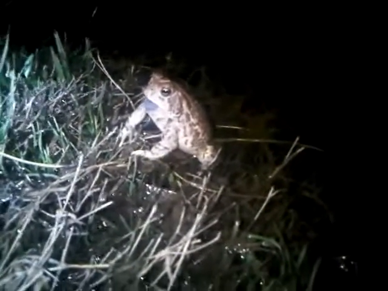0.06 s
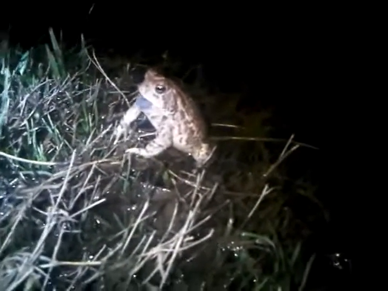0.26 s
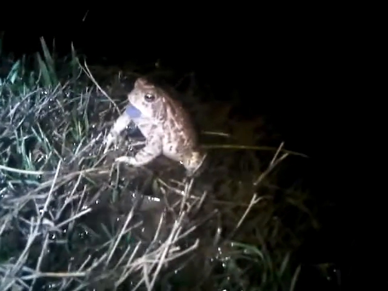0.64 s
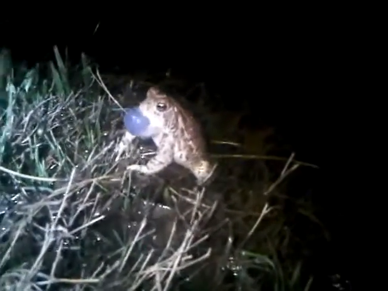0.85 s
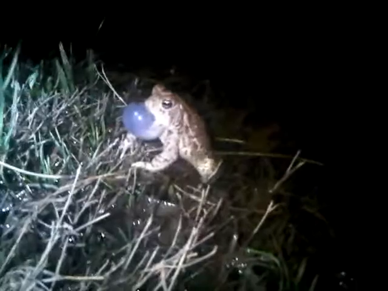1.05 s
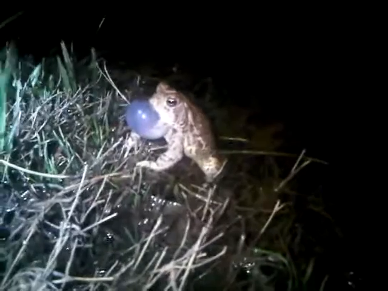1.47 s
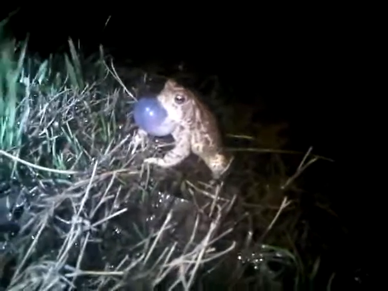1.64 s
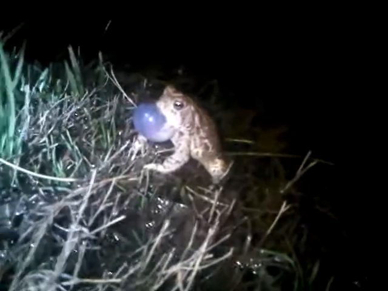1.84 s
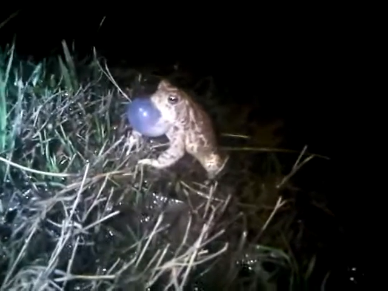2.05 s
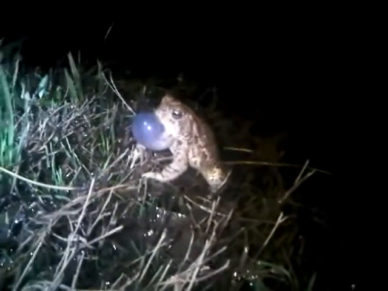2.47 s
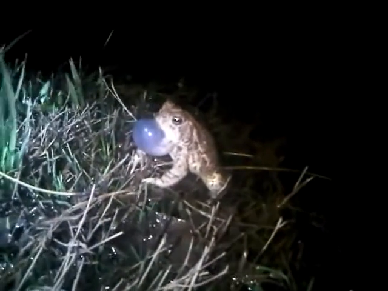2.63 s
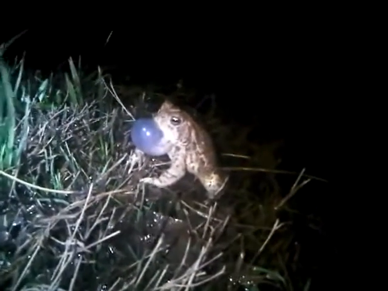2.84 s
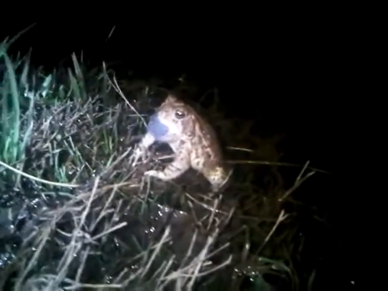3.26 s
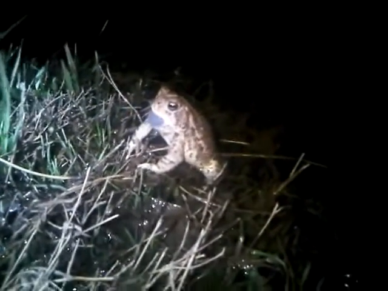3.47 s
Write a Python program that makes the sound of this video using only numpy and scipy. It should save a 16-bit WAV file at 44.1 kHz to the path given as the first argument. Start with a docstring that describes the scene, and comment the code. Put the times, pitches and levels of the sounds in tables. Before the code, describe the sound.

A nearby toad trills outdoors at night, rising in pitch into one long, rapid, even buzz. Before it starts, light wind and dull handling crackles touch the microphone, while a second toad trills faintly in the distance.

```python
"""In the grass at night, a toad close to the microphone swells its throat and trills for 2.5 seconds.
Each pulse is a short burst of one tone, with overtones, snaps of the larynx and the ring of the vocal sac;
the tone glides up and the pulses separate as the call starts. Farther off, a toad ends a call and
begins another. Moving air buffets the microphone softly; there are dull handling crackles and one tick."""
import sys
import numpy as np
from scipy import signal
from scipy.fft import rfft, irfft, next_fast_len
from scipy.io import wavfile
from scipy.ndimage import map_coordinates

SR = 44100
rng = np.random.default_rng(int(sys.argv[2]) if len(sys.argv) > 2 else 0)


def unload_wav(signal):
    """Save mono or channel-first audio to the path in sys.argv[1] as 16-bit WAV at rate SR, clipped to [-1, 1]."""
    wavfile.write(
        sys.argv[1],
        SR,
        np.round(np.clip(np.atleast_2d(signal).T, -1, 1) * 32767).astype(np.int16),
    )


N = 154350
T = np.arange(N) / SR

# Overtones of both toads: multiple of the tone, relative level/dB
OVERTONES = [(2, -21.5), (3, -24)]


def amp(db):
    """Decibels to gain."""
    return 10 ** (np.asarray(db) / 20)


def unit(x):
    """x at rms 1."""
    return x / np.sqrt(np.mean(x ** 2) + 1e-20)


def curves(rows, at):
    """Each column after the time, read at the given times."""
    times, *columns = np.transpose(rows)
    return [np.interp(at, times, column) for column in columns]


def wobble(rate):
    """A smooth random curve, rate knots a second."""
    return map_coordinates(rng.standard_normal(int(N * rate / SR) + 4), [T * rate])


def filtered(x, response):
    """x times a response of frequency."""
    size = next_fast_len(N + SR // 2)
    return irfft(rfft(x, size) * response(np.fft.rfftfreq(size, 1 / SR)), size)[:N]


def coloured(x, points):
    """x through (f/Hz, level/dB) points on a log axis."""
    f, db = np.transpose(points)
    return filtered(x, lambda hz: amp(np.interp(np.log(hz + 1), np.log(f), db)))


def resonance(x, centre_hz, width_hz):
    """x through one ringing resonance."""
    return filtered(x, lambda f: 1j * f * width_hz / (centre_hz ** 2 - f ** 2 + 1j * f * width_hz))


def windows(times, size):
    """Sample numbers around each time, and their distance from it in s."""
    index = np.round(times * SR).astype(int)[:, None] + np.arange(-size, size + 1)
    return index, index / SR - times[:, None]


def summed(index, waves):
    """Short waves laid on the time line."""
    inside = (index >= 0) & (index < N)
    return np.bincount(index[inside], waves[inside], N)


def clicks(times, gains):
    """Impulses that may fall between samples."""
    index, t = windows(times, size=8)
    return summed(index, gains[:, None] * np.sinc(t * SR) * np.hanning(t.shape[1]))


def air(lumpy_db=3.5, hiss_db=-81):
    """Air moving past the microphone makes a lumpy rumble over a very faint steady hiss."""
    # Strength of the rumble: t/s, level/dB
    gusts = [(0, -38), (.1, -54), (.25, -35.5), (.34, -52.5), (.385, -55), (.43, -28), (.52, -37),
             (.62, -39), (.75, -41), (.87, -34.5), (1.0, -46), (1.12, -36), (1.22, -56.5), (1.53, -43),
             (1.66, -58.5), (1.76, -38.5), (1.83, -55), (1.92, -37.5), (2.02, -58.5), (2.6, -50.5),
             (2.77, -38), (2.9, -59.5), (3.2, -61), (3.42, -51)]
    # Spectra of rumble and hiss: f/Hz, relative level/dB
    rumble_colour = [(20, -26), (60, -5), (130, 4), (250, -0.5), (400, -11.5), (700, -23.5), (1200, -30),
                     (2200, -51.5), (3200, -86.5)]
    hiss_colour = [(30, 18.5), (300, 14.5), (1500, -2), (3000, -0.5), (7000, 0.5), (7700, -26.5),
                   (16000, -14.5)]
    level_db, = curves(gusts, T)
    lumps = rng.standard_normal(N) * amp(lumpy_db * wobble(140))
    rumble = unit(coloured(lumps, rumble_colour))
    hiss = unit(coloured(rng.standard_normal(N), hiss_colour))
    return amp(level_db) * rumble + amp(hiss_db) * hiss


def buffets(steepness=2.54, trim_db=-2, low_cut_hz=137):
    """Each buffet is one rounded push and pull of air on the microphone."""
    # Buffets: t/s, relative level/dB, f/Hz
    puffs = [(0.057, -21.5, 181), (0.115, -27.5, 188), (0.15, -22, 195), (.212, -20, 191), (.245, -25, 223),
             (0.257, -29, 254), (0.28, -24, 280), (.362, -21.5, 298), (.374, -23, 268), (0.395, -15.5, 227),
             (.41, -10.5, 207), (0.416, -25, 178), (0.43, -16, 293), (.445, -20, 405), (0.451, -15, 319),
             (0.467, -33, 290), (0.478, -19.5, 367), (0.5, -38, 223), (0.531, -17, 232), (.557, -20.5, 300),
             (0.578, -16.5, 295), (.609, -13, 344), (.633, -16.5, 420), (.652, -16.5, 340),
             (0.688, -29, 190), (0.709, -25, 192), (0.778, -26, 200), (0.841, -15.5, 250),
             (0.913, -25, 170), (1.08, -31.5, 244), (1.099, -19, 331), (1.109, -17.5, 279.1),
             (1.401, -29.5, 186), (1.463, -27, 224), (1.525, -22, 356), (1.542, -24, 270.3),
             (1.745, -24, 227), (1.759, -24.5, 300), (1.911, -23.5, 219.9), (1.927, -26.5, 288.3),
             (2.095, -29.5, 208), (2.262, -29.5, 196), (2.531, -29.5, 192), (2.591, -35, 203),
             (2.686, -24.5, 190), (2.728, -23.5, 359), (2.763, -15.5, 241.4), (2.776, -20.5, 242),
             (2.798, -26, 310), (3.354, -24, 177)]
    times, db, hz = np.transpose(puffs)
    index, t = windows(times, size=1500)
    random_turn = np.exp(2j * np.pi * rng.random((len(times), 1)))
    push = random_turn / (1 - 2j * np.pi * hz[:, None] * t / steepness) ** steepness
    pushes = summed(index, amp(db + trim_db)[:, None] * push.real * np.hanning(t.shape[1]))
    return filtered(pushes, lambda f: 1j * f / (low_cut_hz + 1j * f))


def crackles(half_s=0.0018):
    """Handling noise: each crackle is a few milliseconds of dull noise."""
    # Crackles: t/s, relative level/dB
    touches = [(.41, -20.5), (0.434, -23.5), (.446, -23), (.452, -26), (.481, -25), (0.497, -23.5),
               (.554, -30), (.58, -21), (0.607, -28), (0.631, -29.5), (.644, -29.5)]
    # Their spectrum: f/Hz, level/dB
    colour = [(100, -17), (400, 4.5), (900, 1), (2200, -30), (3000, -55), (5000, -59.5)]
    times, db = np.transpose(touches)
    index, t = windows(times, size=400)
    envelope = summed(index, amp(db)[:, None] * np.exp(-(t / half_s) ** 2))
    return coloured(envelope * rng.standard_normal(N), colour)


def tick(at_s=2.3605, corner_hz=960):
    """One sharp dry tick: a low-passed impulse."""
    impulse = clicks(np.array([at_s]), amp([-3.5]))
    return filtered(impulse, lambda hz: 1 / (1 + 1j * hz / corner_hz))


def ground_scatter(x, level_db=-24, t60_s=.09):
    """The surroundings scatter a short weak tail back to the microphone."""
    t = T[:SR // 4]
    tail = rng.standard_normal(len(t)) * amp(-60 * t / t60_s)
    return amp(level_db) * signal.fftconvolve(x, tail / np.linalg.norm(tail))[:N]


def overtone_wave(phase):
    """The overtones of a tone with this phase."""
    return sum(amp(db) * np.cos(round(multiple) * phase) for multiple, db in OVERTONES)


def gliding_overtones(count, voice_rows, settle_s, warble=0.054, growth=0.6, trim_db=-6.5):
    """During the opening glide the overtones run on unbroken and warble once a pulse."""
    hz, db, _ = curves(voice_rows, T)
    phase = 2 * np.pi * np.cumsum(hz * (1 + warble * np.sin(2 * np.pi * count))) / SR
    fade = np.minimum(2 * count, 1) * np.interp(T, settle_s, [1, 0])
    level_db = trim_db + db.max() + growth * (db - db.max())
    return fade * amp(level_db) * overtone_wave(phase)


def pulsed_overtones(burst, phase, gain, settled, growth=0.64, sharpness=2.5):
    """In the steady trill the overtones come in shorter bursts and grow more slowly than the tone."""
    strength = gain.max() * (gain / gain.max()) ** growth * amp(-3 * settled)
    return (settled * strength)[:, None] * burst ** sharpness * overtone_wave(phase)


def vocal_sac(tone, pulsing, ring_hz=1715, t60_s=.02):
    """The sac rings freely only between pulses."""
    ring = resonance(tone, ring_hz, width_hz=np.log(1000) / (np.pi * t60_s))
    return amp(-3) * np.exp(-2 * pulsing) * ring


def larynx(times, gain, snap_scatter_db, rasp_envelope, rasp_db=-24):
    """With each pulse the larynx opens, flaps and shuts, and noise escapes; the throat colours both."""
    # The three snaps: t/ms from the middle of a pulse, relative level/dB
    snap_rows = [(-1.54, 3), (0.7, -2), (2.5, 0.5)]
    # Response of the throat: f/Hz, level/dB
    throat = [(250, -26.5), (550, -3.5), (750, -3.5), (1000, 5), (1300, 7), (1900, 14.5), (2150, 5),
              (2350, -3), (2600, -2), (2800, -8), (3100, -2.5), (3450, -23.5), (3750, -13.5), (3950, -24.5),
              (4150, -7), (4400, -24.5), (4700, -19), (5050, -44.5), (5350, -36), (5550, -35),
              (5750, -34.5), (6000, -41.5), (7200, -66.5), (9000, -81.5)]
    # A high resonance that comes out late in the call: t/s, relative level/dB
    whistle_levels = [(1.0, -11), (1.4, -19), (2.3, -18), (2.7, -11.5), (3.25, -9)]
    snaps = sum(clicks(times + ms / 1000, gain * amp(db + scatter_db))
                for (ms, db), scatter_db in zip(snap_rows, snap_scatter_db))
    rasp = amp(rasp_db) * rasp_envelope * rng.standard_normal(N)
    whistle_db, = curves(whistle_levels, T)
    whistle = amp(whistle_db) * resonance(snaps, centre_hz=4175, width_hz=110)
    return coloured(snaps + rasp, throat) + whistle


def trill(rate_rows, voice_rows, settle_s, buzz_db, jitter_s):
    """One call: a train of tone bursts with overtones, the ring of the sac and the buzz of the larynx."""
    # Colour of the overtones: f/Hz, level/dB
    overtone_colour = [(2200, 5.5), (3100, -12), (3450, -19.5), (3750, -16), (4200, -16), (4500, -24.5),
                       (4950, -32.5), (6200, -27.5), (7000, -41.5)]
    rate, = curves(rate_rows, T)
    calling = (T >= rate_rows[0][0]) & (T <= rate_rows[-1][0])
    count = np.cumsum(rate * calling) / SR
    times = np.interp(np.arange(.5, count[-1]), count, T)
    late, louder, higher, *snap_chance = rng.standard_normal((400, 6))[:len(times)].T
    loosening = 1 + 0.23 * (times - times[0])  # the timing loosens as the toad tires
    times = times + jitter_s * loosening * late

    hz, db, half_ms = curves(voice_rows, times)
    gain = amp(db + .2 * louder)
    settled = np.interp(times, settle_s, [0, 1])
    hz = hz * (1 + 0.0038 * settled * higher)
    # The phase runs on from pulse to pulse at first; once settled, all pulses start in the same phase.
    cycles = np.diff(times, prepend=times[0]) * (hz + np.roll(hz, 1)) / 2
    start = np.cumsum((1 - settled) * (cycles - np.round(cycles)))
    index, t = windows(times, size=500)
    phase = 2 * np.pi * (start[:, None] + hz[:, None] * t)
    burst = np.exp(-np.abs(1000 * t / half_ms[:, None]) ** 2.48)  # a bell with a flattened top
    tone = summed(index, gain[:, None] * burst * np.cos(phase))

    overtones = gliding_overtones(count, voice_rows, settle_s)
    overtones += summed(index, pulsed_overtones(burst, phase, gain, settled))
    sac = vocal_sac(tone, pulsing=summed(index, burst))
    rasp_envelope = summed(index, (gain * (0.22 + 0.84 * settled))[:, None] * burst)
    buzz = larynx(times, gain * settled, 0.5 * np.array(snap_chance), rasp_envelope)
    return tone + sac + coloured(overtones, overtone_colour) + amp(buzz_db) * buzz


def far_toad():
    """Farther from the microphone, lower and fainter, a toad ends one call and begins another."""
    # The two calls: t/s, pulse rate/Hz, f/Hz, level/dB, pulse half length/ms
    ending = [(0, 126.6, 1470, -49, 1.93), (.2, 123.5, 1480, -47.5, 2.5), (.3, 118.5, 1440, -50, 2.8),
              (.38, 104, 1420, -51.5, 2)]
    next_call = [(1.5, 96.7, 1184, -61.5, 6.9), (1.65, 114.8, 1399, -42, 3.46),
                 (1.85, 119.9, 1572, -36.5, 2.6), (2.5, 117, 1557, -33.5, 3.2),
                 (3.28, 114.4, 1532, -34.5, 2.26), (3.51, 112.7, 1547, -37, 3.04)]
    calls = np.zeros(N)
    for rows, settle_s in [(ending, (-2, -1)), (next_call, (1.75, 2.1))]:  # the first is already steady
        rates = [(s, rate) for s, rate, *_ in rows]
        voice = [(s, *rest) for s, _, *rest in rows]
        calls += trill(rates, voice, settle_s, buzz_db=-6, jitter_s=2e-5)
    return calls


def near_toad():
    """Close by, the pulse rate climbs, sags as the toad tires and drops at the end."""
    # Pace through the call: t/s, pulse rate/Hz
    rising = [(.771, 94.32), (.82, 102.59), (.87, 110.59), (1.0, 120.41)]
    held = [(1.12, 122.79), (1.3, 121.76), (1.53, 120.3), (1.8, 116.9), (2.1, 115.28), (2.355, 112.32),
            (2.36, 32.71), (2.365, 112.38)]  # at the tick, a brief dropout shifts the pulses by half a beat
    tiring = [(2.75, 110.72), (3.15, 108.42), (3.2, 103.54), (3.25, 89.87), (3.266, 67)]
    # Tone of the pulses: t/s, f/Hz, level/dB, pulse half length/ms
    voice = [(.768, 1163, -39, 4.5), (.81, 1254, -35.5, 4.5), (.87, 1352, -27.5, 3.5),
             (0.958, 1456, -23, 3.7), (1.029, 1527, -16.5, 3.25), (1.101, 1590, -17.5, 2.3),
             (1.2, 1611, -19, 1.96), (1.5, 1625, -18, 1.6), (1.85, 1620, -18, 1.84),
             (2.3, 1620, -17.5, 2.1), (2.9, 1613, -18, 2.26), (3.245, 1602, -17, 2.18),
             (3.26, 1410, -29, 2.26)]
    return trill([*rising, *held, *tiring], voice, settle_s=(1.04, 1.12), buzz_db=-3.5, jitter_s=3e-5)


def scene():
    """Both toads in the open, heard from one microphone with the noises at it."""
    toads = near_toad() + far_toad()
    return (toads + ground_scatter(toads) + buffets() + crackles() + air() + tick())[None]


def record(dry):
    """Nothing above 16.2 kHz is kept."""
    return np.array([filtered(channel, lambda hz: hz < 16200) for channel in dry])


dry = scene()
out = record(dry)
unload_wav(out)
```